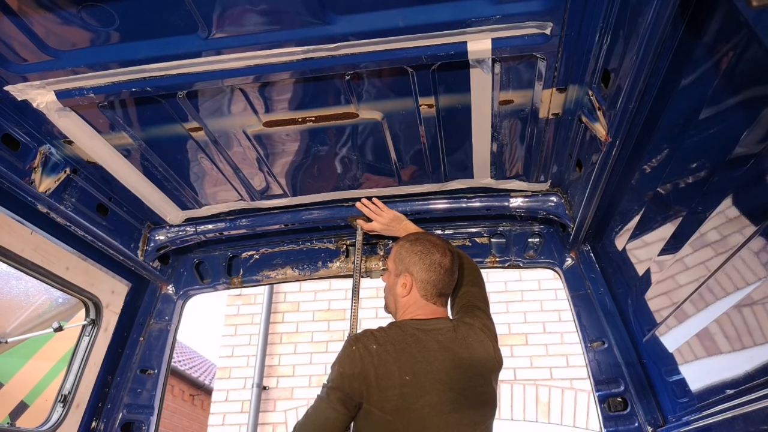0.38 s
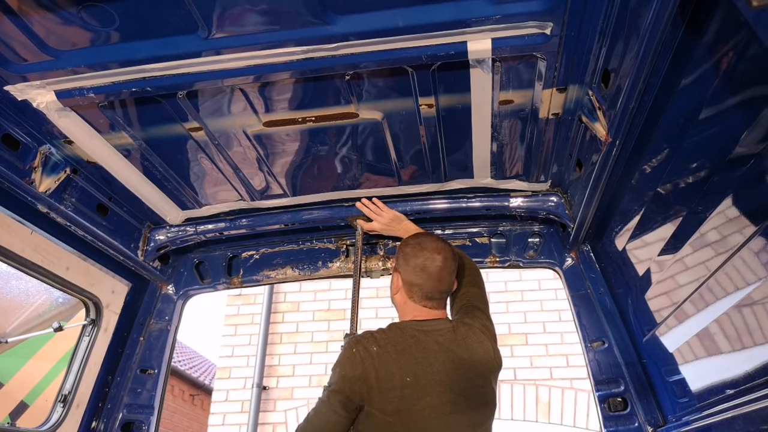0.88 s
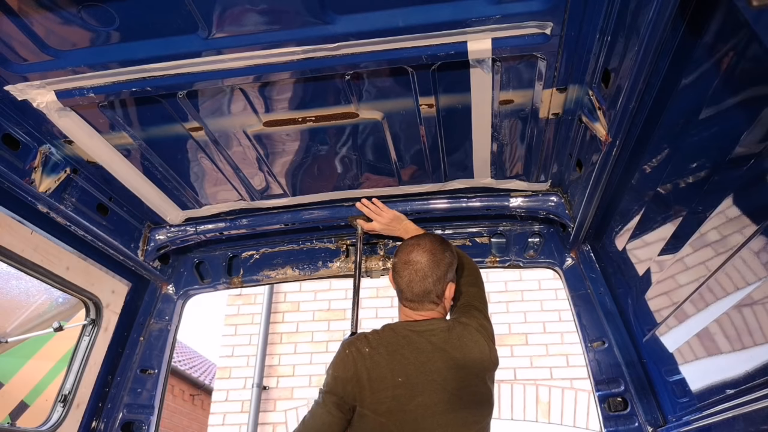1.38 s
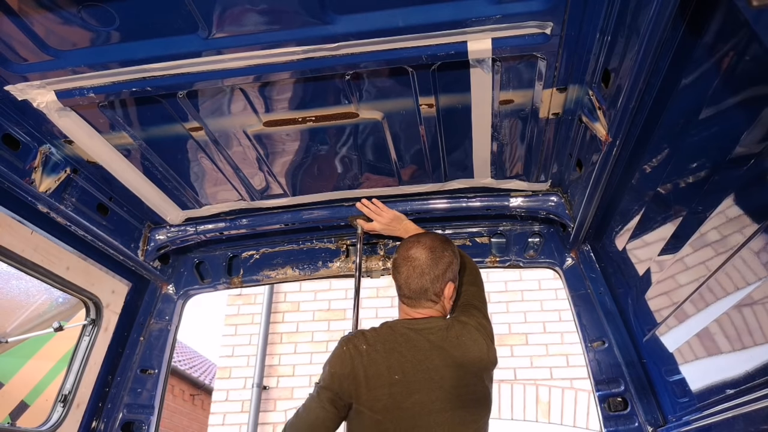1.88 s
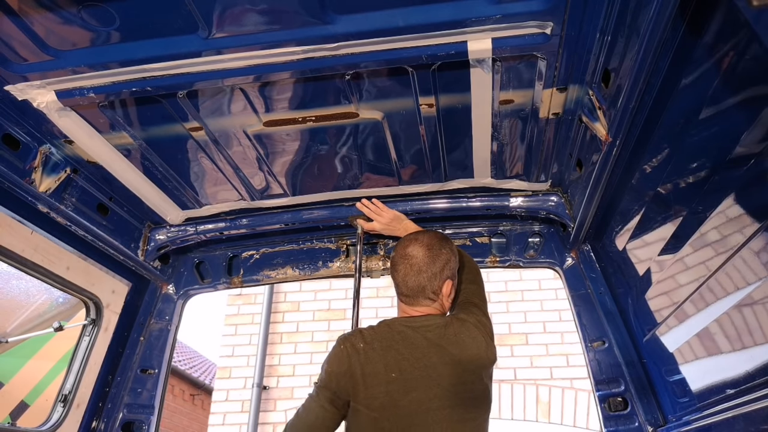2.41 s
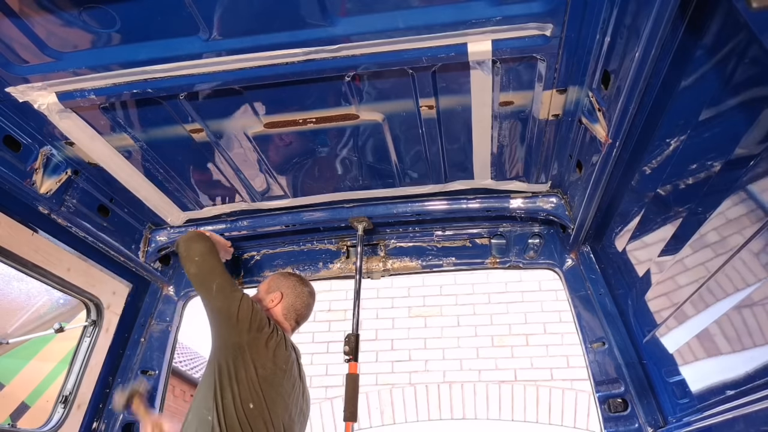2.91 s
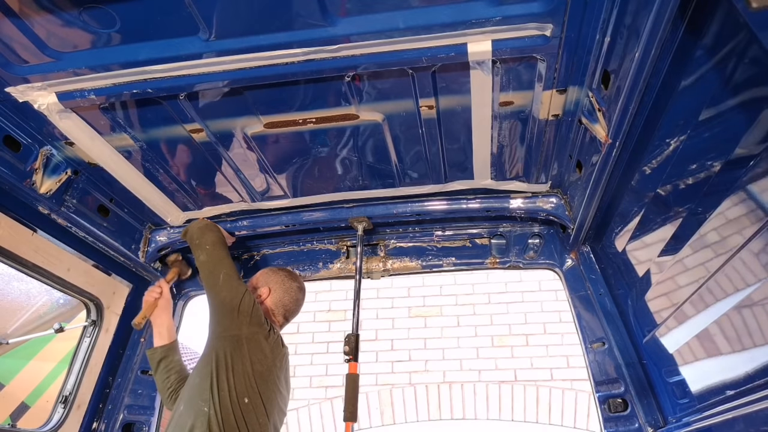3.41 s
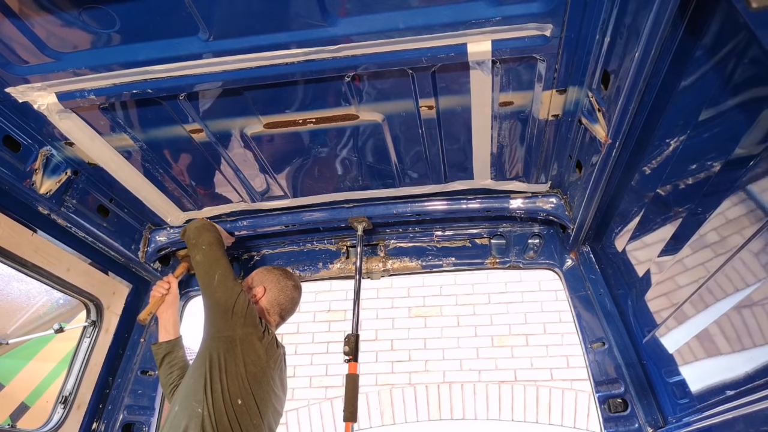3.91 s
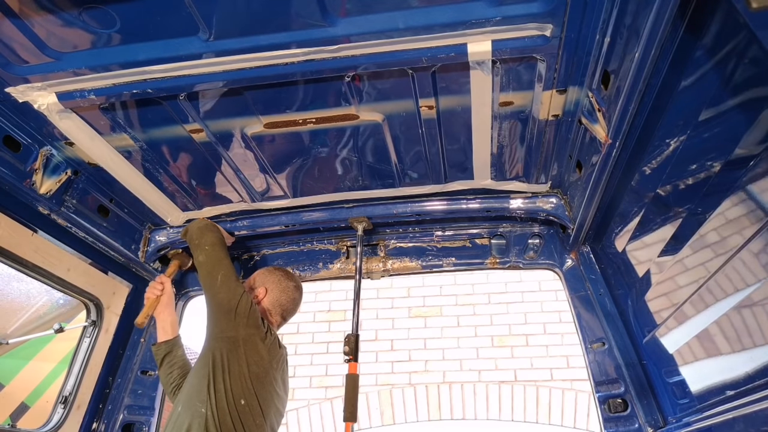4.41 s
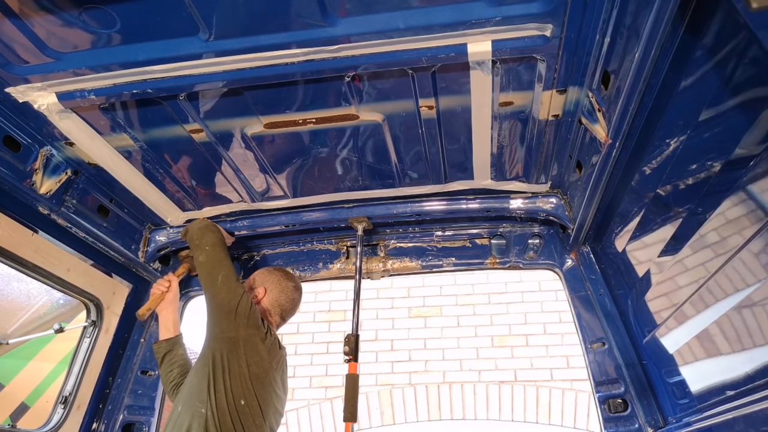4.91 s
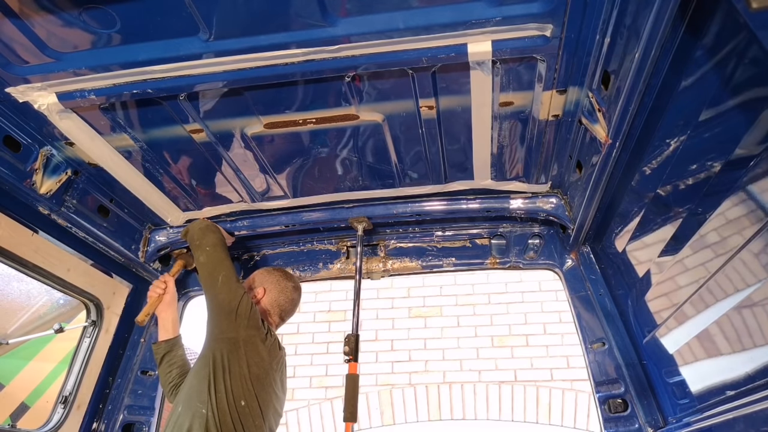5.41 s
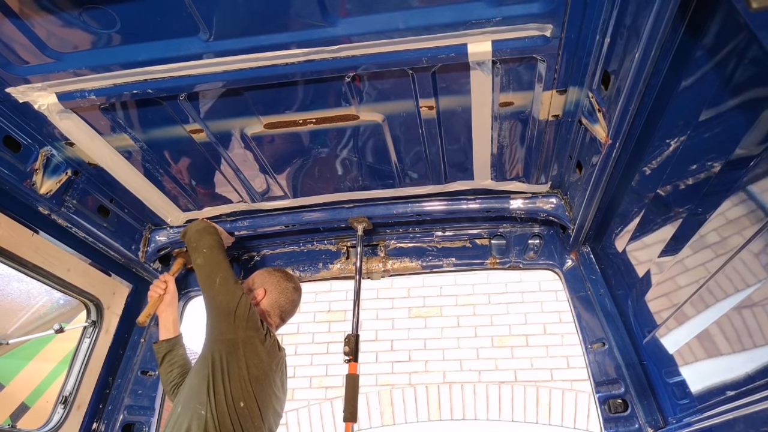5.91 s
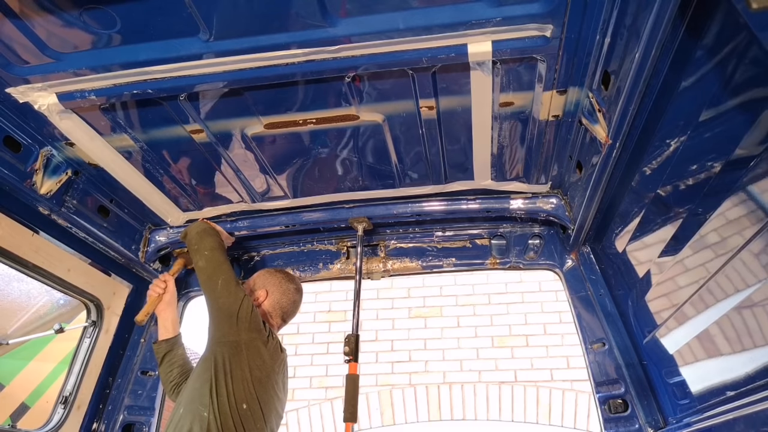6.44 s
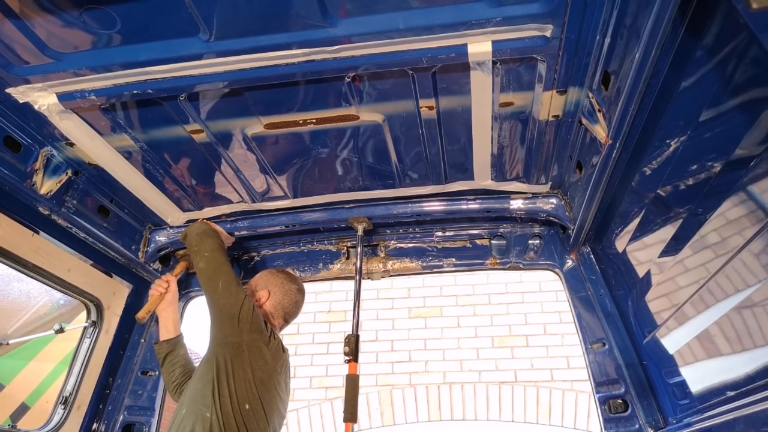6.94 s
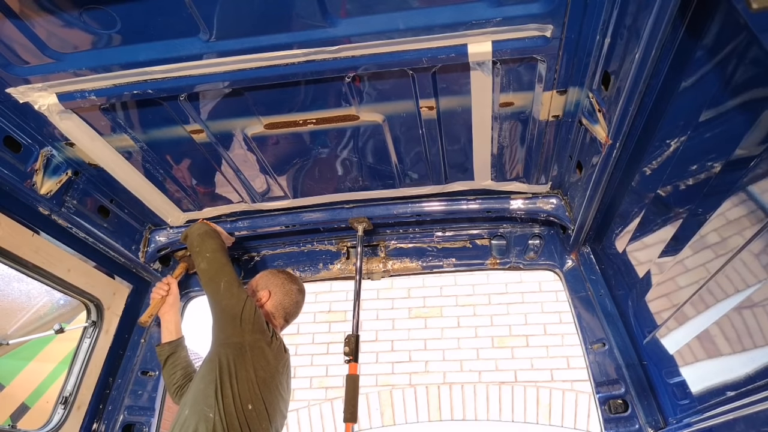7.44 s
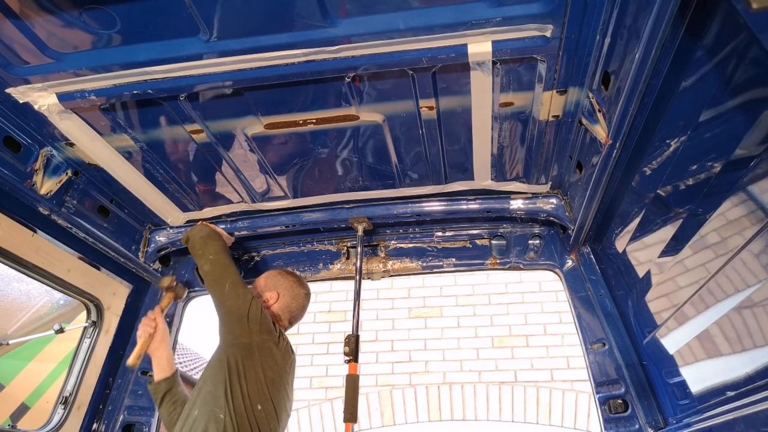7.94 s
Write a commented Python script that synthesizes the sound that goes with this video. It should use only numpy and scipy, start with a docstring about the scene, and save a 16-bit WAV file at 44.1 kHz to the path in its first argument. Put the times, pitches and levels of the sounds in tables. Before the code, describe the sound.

Inside an empty steel van, a ratchet prop is pumped up under a roof rib: short rubs of rod and cloth, low metal groans, and sparse bright clacks over faint street rumble and hiss. A soft bump and knock follow. Then a mallet strikes the rib about three times a second, thirteen loud hollow blows, their ringing overlapping, the close stereo microphone overloading.

```python
"""A mallet drives a roof rib home inside an empty steel van: a fast run of blows, each a sum of decaying
shell modes and dense panel noise, overloads the microphone input. Before it a ratchet prop is pumped up under
the rib: friction noise for rod and cloth, random slips exciting shell modes for the groan, and modal
ticks with noise tails for the pawl's clacks. Soft bumps of feet and knees wake the lowest modes;
coloured noise gives the street rumble and a thin hiss that drops as the blows begin."""
import sys
import numpy as np
from scipy import signal
from scipy.fft import rfft, irfft, next_fast_len
from scipy.io import wavfile
from scipy.ndimage import uniform_filter1d

SR = 44100
rng = np.random.default_rng(int(sys.argv[2]) if len(sys.argv) > 2 else 0)


def generate_wav(signal):
    """Clip the signal to [-1, 1] and save it as 16-bit WAV at the path in sys.argv[1]."""
    frames = np.transpose(np.atleast_2d(signal))
    scaled = np.clip(frames, -1, 1) * 32767
    pcm = np.round(scaled).astype(np.int16)
    wavfile.write(sys.argv[1], SR, pcm)


def rack_gain(trim_db):
    """Turn a fader trim in dB into the linear factor to multiply a signal by."""
    fader = np.asarray(trim_db, float)
    return 10 ** (fader / 20)


N = 355887

# modes of the steel shell: (frequency [Hz], relative level [dB], t60 before scaling by ring [s])
SHELL_MODES = [(46.2, -13, 1.1), (53, -22.5, 0.6), (72, -25, 2.9), (84.5, -22.5, 1.6), (99.44, -12.5, 0.64),
               (135.3, -18.5, 1.04), (165.6, -13, 0.82), (175, -19.5, 0.59), (184.6, -10, 0.32),
               (197.6, -1, 0.3), (202.2, -17, 1.0), (215.1, -13, 1.0), (228, -15, .95), (259.6, -12, 0.39),
               (281.7, -12.5, 0.6), (318.3, -1, 0.19), (345, -8.5, 0.45), (352.3, -8.5, 0.46),
               (389.4, -7, 0.3), (408, -5, 0.32), (416.2, -3.5, 0.28), (435.6, -17, 0.54),
               (470.4, -9, 0.27), (541, -25, 0.13), (569, -13, 0.46), (549.7, -16.5, 0.33),
               (603.3, -11.5, 0.38), (619, -15.5, 0.59), (656, -9.5, 0.33), (802, -13.5, 0.19),
               (880, -13.5, 0.3), (915, -19.5, 0.19), (977, -20.5, 0.21), (1015, -15, 0.1),
               (1084, -14, 0.2), (1160, -25.5, 0.17), (1126, -28.5, 0.27), (1277, -11.5, 0.12),
               (1308, -27.5, 0.22)]
# likeness of the left and right sound: (frequency [Hz], correlation [-1 to 1])
LIKENESS = [(60, 0.97), (130, 0.9), (230, .9), (350, 0.93), (640, 0.57), (1390, -0.06), (3060, 0.03),
            (6720, -0.01), (14800, -0.01)]


def evened(x):
    """Normalises the mean power: scales to rms 1."""
    return x / np.sqrt(np.mean(x ** 2) + 1e-20)


def front(x):
    """Normalises a decaying sound by its early power: rms 1 over the first 30 ms."""
    early = x[:, :SR * 3 // 100]
    return x / np.sqrt(np.mean(early ** 2))


def read(points, hz):
    """Interpolates a table along a logarithmic frequency axis, as pitch is heard."""
    f, value = np.transpose(points)
    return np.interp(np.log(hz + 1), np.log(f + 1), value)


def level(rows):
    """Amplitude envelope, linear in decibels between (time [s], level [dB]) rows and silent outside."""
    s, db = np.transpose(rows)
    return rack_gain(np.interp(np.arange(N) / SR, s, db, left=-200, right=-200))


def add(mix, s, sound):
    """Superposes a stereo sound on the mix from time s."""
    part = mix[:, round(s * SR):][:, :sound.shape[1]]
    part += sound[:, :part.shape[1]]


def coloured(x, points):
    """Linear filtering: multiplies the spectrum by a (frequency [Hz], gain [dB]) table."""
    size = next_fast_len(x.shape[-1] + 4096)
    gain = rack_gain(read(points, np.fft.rfftfreq(size, 1 / SR)))
    return irfft(rfft(x, size) * gain, size)[..., :x.shape[-1]]


def noise(colour, count, size, decay=None, patchy_db=0.):
    """A diffuse field: random short-time spectra correlated between ears, steady or decaying band by band."""
    linger_db, linger = -28, 1.34  # loosely coupled panels die later: start level, factor on t60
    swell_cycles = 1.44
    hop = size // 4
    frames, hz = count // hop + 5, np.fft.rfftfreq(size, 1 / SR)
    a, b, c, d, patches = rng.standard_normal((frames, len(hz), 5)).T
    same = np.clip(read(LIKENESS, hz), -1, 1)[:, None]
    left = a + 1j * b
    right = same * left + np.sqrt(1 - same ** 2) * (c + 1j * d)
    z = np.array([left, right])
    patches = uniform_filter1d(patches, size=9, axis=0)
    patches = evened(uniform_filter1d(patches, size=9, axis=1))
    z *= rack_gain(read(colour, hz)[:, None] + patchy_db * patches)
    if decay is not None:
        t60 = read(decay, hz)[:, None]
        fall_db = -60 * np.arange(frames) * hop / SR / t60
        z *= (rack_gain(fall_db) + rack_gain(linger_db + fall_db / linger)) / np.sqrt(t60)
        elapsed = np.arange(1, frames + 1) * hop / SR
        z *= -np.expm1(-elapsed * hz[:, None] / swell_cycles)  # bass builds slowly
    return signal.istft(z, nperseg=size, noverlap=size - hop)[1][:, :count]


def ringing(modes, phase, scatter_db, ring=0.9, rise_cycles=0.57):
    """Modal superposition: decaying sines swell over a few cycles, high ones out of step at two microphones."""
    hz, db, t60 = np.transpose(modes)[:, :, None]
    t = np.arange(SR) / SR
    alternate = (-1) ** np.arange(len(hz))[:, None]
    skew = 0.9 * np.arccos(np.clip(read(LIKENESS, hz), -1, 1)) * alternate
    size = rack_gain(db + scatter_db[:, None] - 60 * t / (ring * t60))
    size *= -np.expm1(-t * hz / rise_cycles)
    turn = 2 * np.pi * hz * t + phase[:, None]
    return front(np.array([(size * np.sin(turn + side * skew / 2)).sum(0) for side in (-1, 1)]))


def stroke(start, length, first_db, last_db, rise_s, fade_db_per_s):
    """Envelope of one movement: takes hold, runs from first to last level, then decays exponentially."""
    t = np.arange(N) / SR - start
    db = np.interp(t, [0, length], [first_db, last_db]) - fade_db_per_s * np.maximum(t - length, 0)
    return rack_gain(db) * np.clip(t / rise_s, 0, 1) ** 2


def together(gains):
    """Incoherent addition: unrelated movements add by power."""
    return np.sqrt(sum(g ** 2 for g in gains))


def air():
    """Background noise: steady street rumble and a thin hiss that drops as the blows begin."""
    # spectrum of the floor: (frequency [Hz], relative level [dB])
    floor_colour = [(12, -34), (20, 8.5), (59, 5), (250, -15.5), (473, -19.5), (529, -22), (608, -21),
                    (1650, -28.5), (2570, -30), (3900, -36), (5760, -36), (6610, -25), (7390, -34),
                    (9490, -25.5), (15200, -49.5)]
    # extra treble added to the floor: (time [s], level [dB])
    hiss_drift = [(0, 11), (2.4, 5.5), (2.6, 2), (3.5, 6.5), (3.6, -16), (8.07, 0)]
    floor = rack_gain(-41) * evened(noise(floor_colour, N, size=2048, patchy_db=2.0))
    hiss = coloured(floor, [(3000, -60), (5000, 0)])
    return floor + hiss * level(hiss_drift)


def slide():
    """Friction noise: a hiss follows rod, cloth and sleeve, and also gives short bright tails of the clacks."""
    # spectra of rod and cloth, and of a sleeve on steel: (frequency [Hz], relative level [dB])
    rod_colour = [(290, -32), (500, -18), (886, -4.5), (1070, -9), (2780, -8.5), (3300, -6), (3800, -9),
                  (7130, -7.5), (8470, 3), (10300, 0), (15200, -19)]
    sleeve_colour = [(3000, -22.5), (4000, 1.5), (5500, 4), (7000, -23)]
    # rubs of rod and cloth, most swelling until they stop, and short bright tails of the clacks:
    # (start [s], length [s], first relative level [dB], last relative level [dB])
    rubs_and_tails = [(0.0, 0.043, -40.5, -39.5), (0.178, 0.072, -43, -40), (0.276, 0.052, -43, -35),
                      (0.439, 0.075, -46, -40.5), (0.63, 0.16, -46.5, -37.5), (0.88, .1, -50.5, -42.5),
                      (1.078, 0.061, -45, -37), (1.178, 0.092, -43.5, -35), (1.35, 0.13, -48.5, -43.5),
                      (1.644, 0.089, -40, -35.5), (1.718, .03, -42.5, -37), (1.845, .015, -49, -47),
                      (1.91, 0.023, -48, -44.5), (1.963, 0.12, -46, -45.5), (2.2, .095, -46.5, -36.5),
                      (2.306, 0.022, -32, -28.5), (2.406, 0.025, -40.5, -37.5),
                      (2.478, 0.059, -52.5, -46.5), (2.835, 0.14, -45, -54), (3.07, 0.025, -47, -48.5),
                      (3.176, 0.015, -46, -39), (3.218, .2, -49.5, -56.5), (7.847, 0.26, -65.5, -43)]
    # cloth that never rests while the man moves, and a sleeve brushing steel: columns as for the rubs
    rustle = (0.0, 3.5, -52, -54)
    sleeve_rub = (3.29, .11, -54, -50)
    grip_s, fade_db_per_s = 0.0042, 254
    envelope = together(stroke(*row, grip_s, fade_db_per_s) for row in [*rubs_and_tails, rustle])
    rod = rack_gain(4.5) * evened(noise(rod_colour, N, size=256, patchy_db=0.9)) * envelope
    brushing = stroke(*sleeve_rub, grip_s, fade_db_per_s)
    return rod + evened(noise(sleeve_colour, N, size=256, patchy_db=2.5)) * brushing


def groan():
    """Stick-slip: uneven slips of rib on roof keep the shell sounding; the load shifts which modes lead."""
    # pump strokes and leanings that load the shell:
    # (start [s], length [s], low groan relative level [dB], high groan relative level [dB])
    strokes = [(0.01, 0.18, -33, -51), (0.195, 0.18, -29, -40.5), (0.604, 0.2, -30.5, -39.5),
               (1.054, 0.26, -30, -37.5), (1.618, 0.16, -27.5, -37), (2.198, 0.14, -27.5, -35.5),
               (2.408, 0.049, -45, -38), (2.835, 0.049, -39, -67), (3.162, 0.083, -34, -46)]
    # faint strain beneath the strokes: columns as for the strokes
    creak = (0.0, 2.1, -50, -59)
    # low and high group of modes, each a filter: (frequency [Hz], gain [dB])
    group_colours = [
        [(60, -10), (125, 2), (240, -8.5), (300, -6), (340, -23)],
        [(270, -22), (330, -10.5), (490, 1.5), (560, -10.5), (1200, -11)],
    ]
    # low and high groan: (change while the load is held [dB], fade once it lets go [dB/s])
    hold_and_release = [(-4, 104), (-1.5, 182.5)]
    slips_per_s, load_s = 400, .035  # mean rate of slips, time the load takes to build
    draw, size, spot = rng.random((N, 3)).T
    slips = (draw < slips_per_s / SR) * rack_gain(-4.0 * np.log(size + 0.0069))  # few large, many small
    out = np.zeros((2, N))
    for group, (colour, (hold_db, fade_db_per_s)) in enumerate(zip(group_colours, hold_and_release)):
        load = together(stroke(s, length, db[group], db[group] + hold_db, load_s, fade_db_per_s)
                        for s, length, *db in [*strokes, creak])
        force = slips * load
        for k in range(3):  # slips at three spots of the rib stir the modes differently
            phase, scatter = rng.standard_normal((2, len(SHELL_MODES)))
            body = ringing(SHELL_MODES, np.pi * phase, 3 * scatter, ring=.4, rise_cycles=1.5)
            body = coloured(body, colour)[:, :SR // 2]
            body /= np.linalg.norm(body[0])
            here = force * (np.floor(spot * 3) == k)
            out += signal.oaconvolve(here[None], body, axes=1)[:, :N]
    return out * np.sqrt(SR / slips_per_s) * rack_gain(-6)


def bumps():
    """Low-pass excitation: the long soft push of a foot or knee mainly wakes the lowest modes."""
    # feet and knees: (time shortly after onset [s], relative level [dB])
    pushes = [(0.009, -13), (2.824, -24), (3.186, -31)]
    top_hz = 157.5  # top of the push's spectrum
    out, t = np.zeros((2, N)), np.arange(SR) / SR
    for s, db in pushes:
        phase, scatter = rng.standard_normal((2, len(SHELL_MODES)))
        ring = ringing(SHELL_MODES, np.pi * phase, 2 * scatter, ring=0.33)
        ring = coloured(ring, [(top_hz, 0), (1.04 * top_hz, -25)])
        push = -np.expm1(-t / 0.0077)
        add(out, max(s - .005, 0), rack_gain(db - 6.5) * front(ring) * push)
    return out


def clacks():
    """Hard impact: a sharp tick, the modes of the pawl and a bright decaying tail from bare steel walls."""
    # pawl and a light touch of the mallet: (time just after onset [s], relative level [dB],
    # dullness as gain at 150-400 Hz [dB])
    hits = [(0.1922, -28, 19), (0.6528, -34, 17), (1.141, -15.5, 6), (1.643, -42.5, 33), (1.722, -11, 5),
            (2.3112, -10.5, 4), (2.4073, -39, 33), (3.1875, -25.5, 10)]
    # spectrum of the tail: (frequency [Hz], relative level [dB])
    tail_colour = [(59, -29.5), (100, -8), (454, -17), (623, -24.5), (737, 0), (872, -12.5), (1900, -10.5),
                   (3420, -6), (5210, -17), (8440, -7.5), (15200, -38.5)]
    # main decay of the tail: (frequency [Hz], t60 [s])
    tail_decay = [(300, 0.52), (1500, 0.35), (5000, 0.31), (12000, 0.14)]
    # modes of pawl and rod: (frequency [Hz], relative level [dB], t60 before scaling by ring [s])
    pawl_modes = [(746, -20, 0.26), (941, -21, 0.21), (2660, 0.5, 0.044), (3433, 1, 0.029),
                  (3760, -5, 0.056), (7100, 0.5, .025), (7900, 3.5, 0.014)]
    out, t = np.zeros((2, N)), np.arange(SR // 2) / SR
    for s, db, dull_db in hits:
        phase, scatter = rng.standard_normal((2, len(pawl_modes)))
        sound = front(noise(tail_colour, SR // 2, size=256, decay=tail_decay))
        sound += rack_gain(-4) * ringing(pawl_modes, np.pi * phase, 2 * scatter)[:, :SR // 2]
        sound = coloured(sound, [(70, -15.0), (150, dull_db), (400, dull_db), (2000, 0)])
        tick = 1 + 0.78 * np.exp(-t / 0.0011)
        rise = -np.expm1(-t / 0.0012)
        add(out, s - .001, rack_gain(db - 10.5) * sound * tick * rise)
    return out


def mallet():
    """Modal excitation: blows on nearly one spot start the modes nearly alike, so most ringing repeats."""
    # blows: (time just after onset [s], strength [dB], clang [dB], knock [dB], crack [dB]),
    # the last three as changes of colour
    blows = [(3.551, -1, -6, 0.5, -1.5), (3.838, 0, -7, -0.5, 0), (4.151, -3.5, -3, 4.5, 1),
             (4.468, -2.5, -3, 4, 1.5), (4.764, -3.5, -1.5, 5, 3), (5.077, -4, -4, 5, -3.5),
             (5.415, -7, -1.5, 4.5, -5), (5.69, -2, -4, 1, -5.5), (5.945, -3.5, -2.5, 4.5, -5.5),
             (6.22, -3, -1, 5.5, -2), (6.515, -4.5, -4.5, 7, -5), (6.812, -2.5, -2, 2.5, -5.5),
             (7.101, -6, 2, 5.5, 0)]
    # where boom, body, clang, knock and crack lie: (frequency [Hz])
    colour_hz = [80, 300, 900, 2800, 9500]
    # dense ringing of all panels and the air between them: (frequency [Hz], relative level [dB])
    panel_colour = [(24, -42.5), (40, -28), (91, -7.5), (130, -9), (215, -6), (365, -14), (500, -8.5),
                    (640, -8), (760, -11.5), (900, -10.5), (1060, -14), (2000, -28.5), (3780, -41),
                    (5500, -44), (7500, -39.5), (9480, -34.5), (15200, -58)]
    # its main decay: (frequency [Hz], t60 [s])
    panel_decay = [(60, 1.1), (160, 1.34), (420, 0.51), (1100, 0.31), (2900, 0.32), (7700, 0.27),
                   (14000, 0.26)]
    # shell modes that start against the others, so the hollow ring throbs: (row, counted from 0)
    opposed = [11, 20]
    alike = .88  # correlation of each blow's panel ringing with the common part
    spot_spread = .3  # how far the blows stray, as mode phase [rad]
    boom_db = -6  # the deepest boom is the same for light and heavy blows
    out, t = np.zeros((2, N)), np.arange(SR) / SR
    common = noise(panel_colour, SR, size=512, decay=panel_decay)
    for s, db, *upper_db in blows:
        shift, scatter = rng.standard_normal((2, len(SHELL_MODES)))
        start = spot_spread * shift + np.pi * np.isin(np.arange(len(SHELL_MODES)), opposed)
        modes = ringing(SHELL_MODES, start, 5 * spot_spread * scatter, rise_cycles=3.8)
        own = noise(panel_colour, SR, size=512, decay=panel_decay)
        panels = front(alike * common + np.sqrt(1 - alike ** 2) * own)
        ring = rack_gain(-2.5) * modes + rack_gain(-3) * panels
        ring = coloured(ring, list(zip(colour_hz, [boom_db - db, 0, *upper_db])))
        rise = np.expm1(-t / 0.0008) ** 2  # the blow's force rises within about two milliseconds
        add(out, s - .002, rack_gain(db) * ring * rise)
    return out


def scene():
    """Linear superposition of all sources in the van."""
    return air() + slide() + groan() + bumps() + clacks() + mallet()


def band_limit(x):
    """A steep low-pass at the top of the band."""
    return signal.sosfilt(signal.butter(12, 15360, fs=SR, output="sos"), x)


def record(dry):
    """Saturation: the preamplifier rounds peaks and the converter clips; the left port hears more treble."""
    # balance of the two ports: (frequency [Hz], left over right [dB])
    lean = [(60, -1.0), (130, 0.0), (290, -2.0), (640, 0.0), (1390, -1.0), (3060, 0.5), (6000, 0.5),
            (8000, 2.0), (14800, 7)]
    ports = np.array([coloured(x, [(f, side * db / 2) for f, db in lean]) for x, side in zip(dry, (1, -1))])
    knee = 0.61  # level at which the preamplifier starts to round the peaks
    headroom = 1.08 - knee
    over = np.maximum(abs(ports) - knee, 0)
    rounded = np.sign(ports) * (np.minimum(abs(ports), knee) + headroom * np.tanh(over / headroom))
    return band_limit(np.clip(rounded, -1, 1))


dry = scene()
out = record(dry)
generate_wav(out)
```